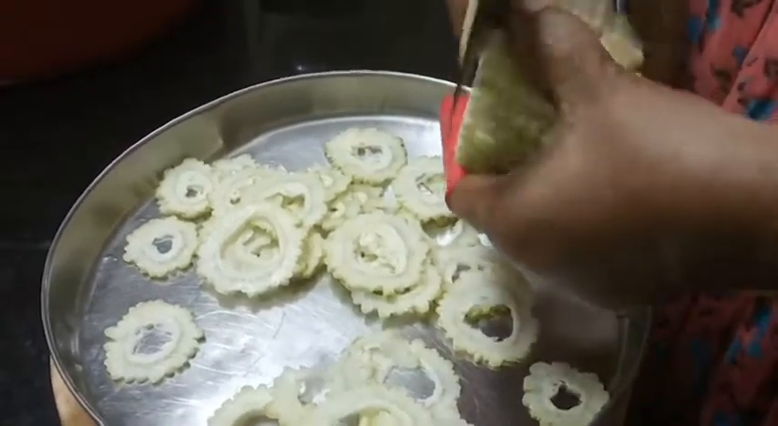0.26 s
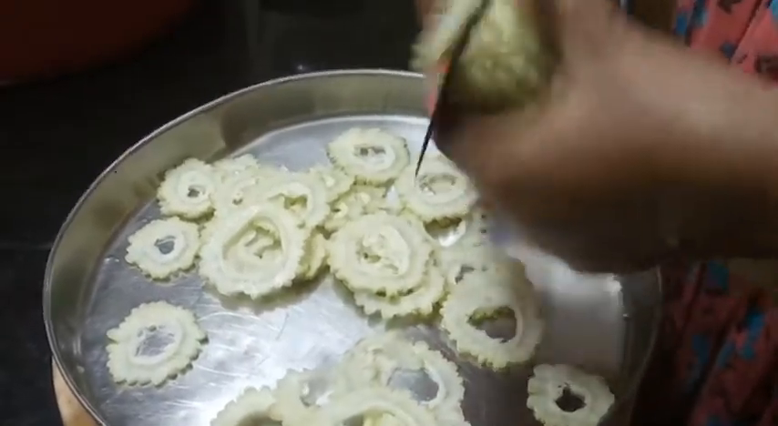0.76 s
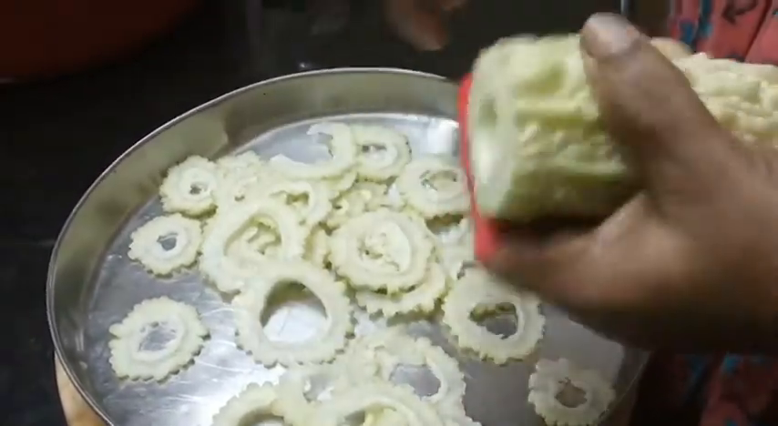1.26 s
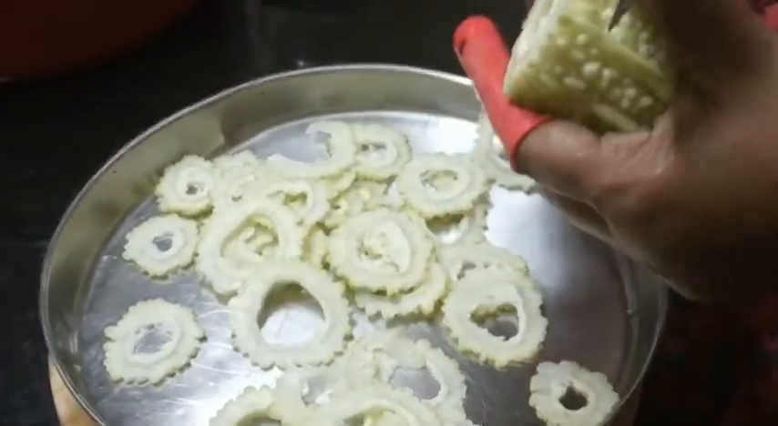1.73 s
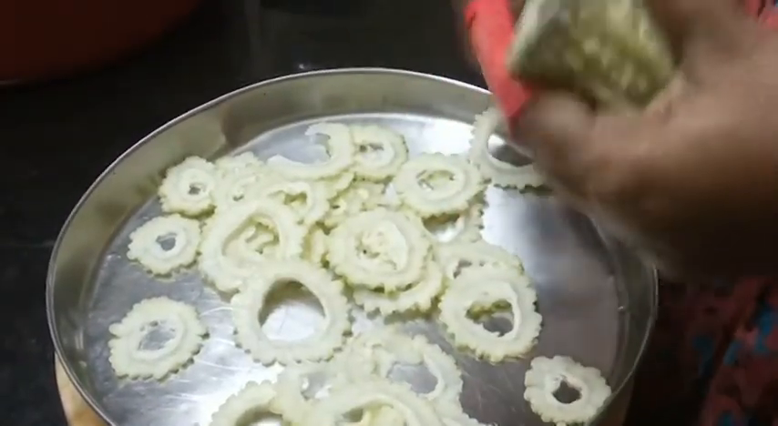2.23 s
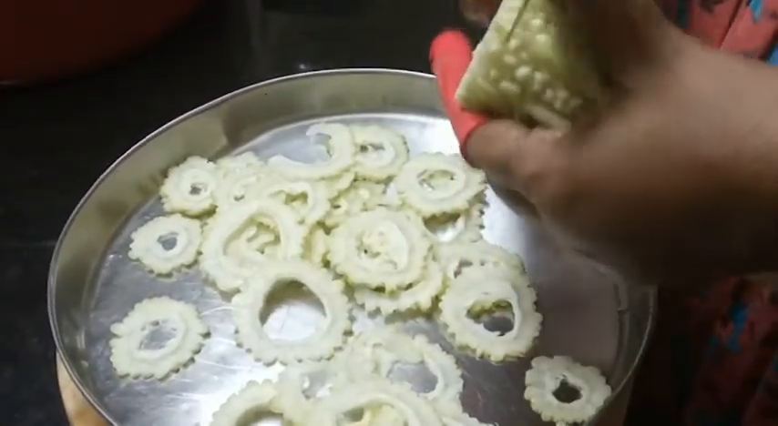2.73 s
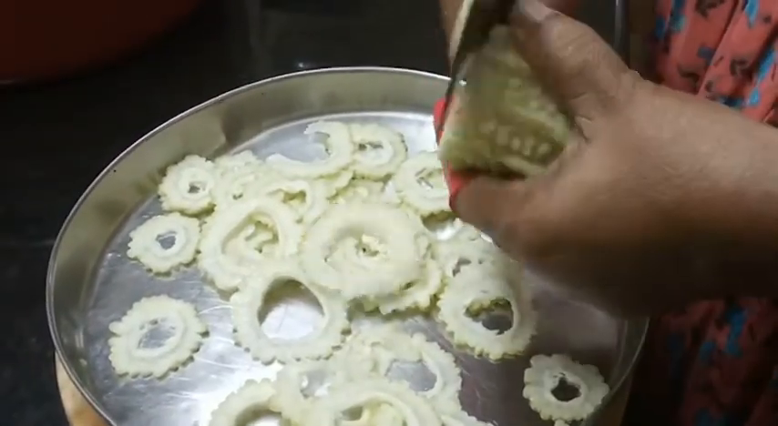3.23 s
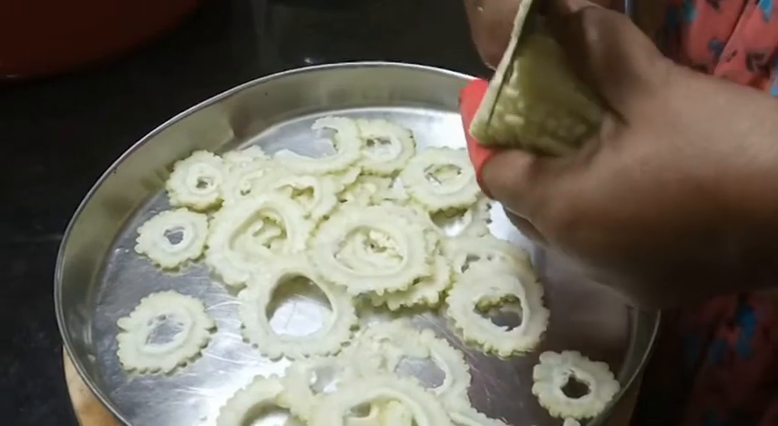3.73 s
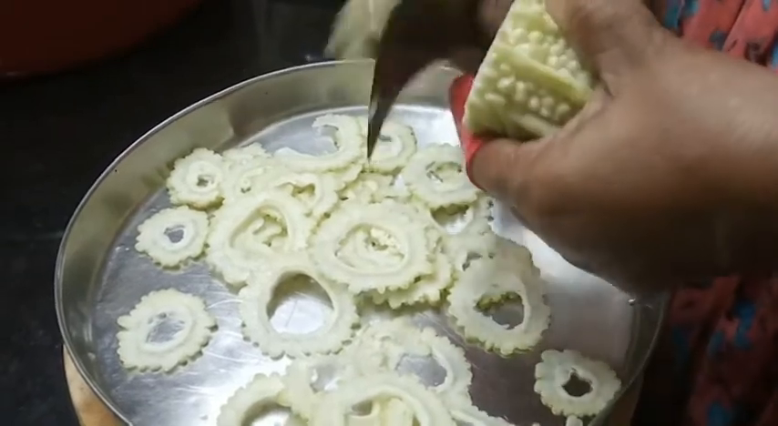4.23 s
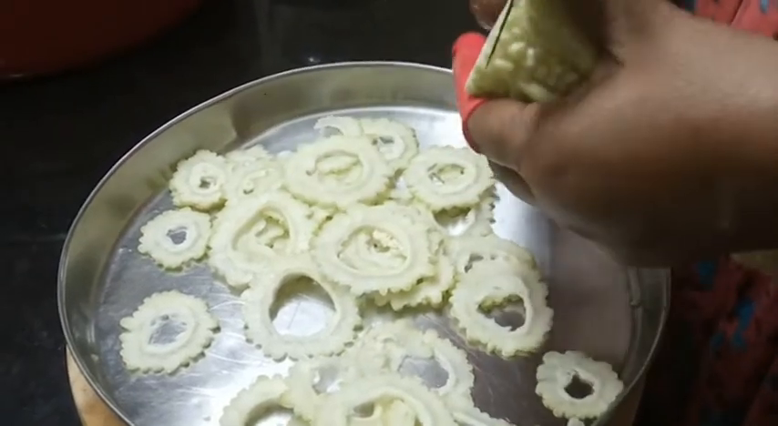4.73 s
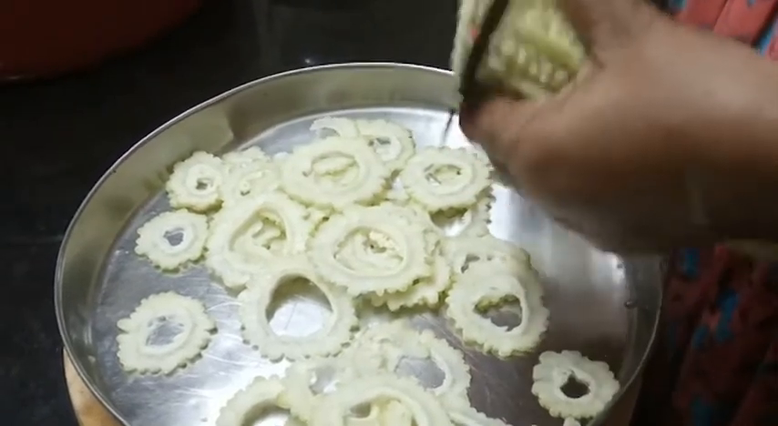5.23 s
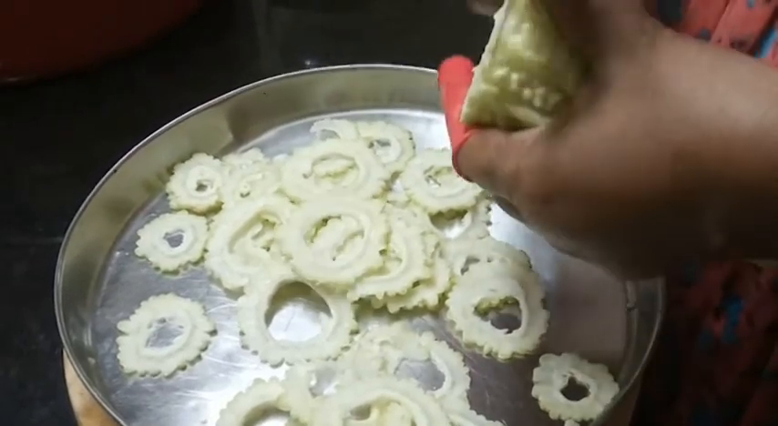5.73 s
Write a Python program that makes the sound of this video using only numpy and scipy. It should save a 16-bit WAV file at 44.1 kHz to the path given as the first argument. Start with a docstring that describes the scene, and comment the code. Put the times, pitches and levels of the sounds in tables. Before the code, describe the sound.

A knife rasps and snaps through a crisp, wet vegetable close to the microphone, in uneven short cuts with dull knocks over a metal tray.

```python
"""Knife through a hollow gourd

A knife saws and snaps through a crisp gourd held over a steel tray, close to a mono phone microphone.
A fine wet rasp of clumped noise swells and fades; each cut is a short burst of crackle.
Fibres snap as clicks with a broad ring; dull, rattling knocks drive the modes of gourd and tray.
Soft patches of resonant noise give low rumble, a hollow ring near 800 Hz and high squeaks.
The phone's noise suppressor lowers quiet bands, so tails end abruptly."""
import sys
import numpy as np
from scipy import signal
from scipy.fft import rfft, irfft, next_fast_len
from scipy.io import wavfile
from scipy.ndimage import uniform_filter1d

SR = 44100
rng = np.random.default_rng(int(sys.argv[2]) if len(sys.argv) > 2 else 0)


def pcm_store(signal):
    """Save signal as 16-bit PCM."""
    levels = np.round(np.clip(np.atleast_2d(signal), -1, 1) * 32767)
    wavfile.write(sys.argv[1], SR, levels.astype(np.int16).T)


N = 263718
HALF_S = np.arange(22050) / SR  # time axis of one event [s]

# Spectrum of breaking flesh, shared by cuts and snaps: (frequency [Hz], relative density [dB per Hz])
CRUNCH_COLOUR = [(410, -29), (700, -11), (1290, -5.5), (2680, -5), (2980, 0), (4340, -3), (6510, 1),
                 (8340, -6), (9630, -3.5), (15800, -15)]


def amp(db):
    """Level to amplitude: 20 dB is a factor of ten."""
    return 10 ** (np.asarray(db) / 20)


def evened(x):
    """Normalisation of signal power: scales x to rms 1."""
    return x / np.sqrt(np.mean(x ** 2) + 1e-20)


def read(points, hz):
    """Logarithmic frequency scale: interpolates a table of (frequency, value) along it."""
    f, value = np.transpose(points)
    return np.interp(np.log(hz + 1), np.log(f + 1), value)


def add(mix, s, sound):
    """Superposition: adds a sound to the mix from time s [s], cut off at the end of the mix."""
    part = mix[round(max(s, 0) * SR):][:len(sound)]
    part += sound[:len(part)]


def colour(x, db):
    """Linear filtering: multiplies the spectrum of x by the gain db(hz)."""
    size = next_fast_len(len(x))
    gain = amp(db(np.fft.rfftfreq(size, 1 / SR)))
    return irfft(rfft(x, size) * gain, size)[:len(x)]


def resonate(x, hz, width_hz):
    """Damped oscillator: one complex pole of about unit gain, whose damping sets the bandwidth."""
    r = np.exp(-np.pi * width_hz / SR)
    pole = r * np.exp(2j * np.pi * hz / SR)
    return 2 * signal.lfilter([1 - r], [1, -pole], x).real


def crackle(size, spread_db, clump):
    """Bursting cells: noise whose level wanders at random, in clumps of about one to five milliseconds."""
    wander = evened(uniform_filter1d(rng.standard_normal(size), size=clump))
    return evened(rng.standard_normal(size) * amp(spread_db * wander))


def rasp():
    """Sliding friction: wet flesh crackles on the blade, the suppressor opening and closing its ends."""
    # Contour before spectrum and make-up gain: (time [s], relative level [dB])
    contour = [(0.0, -31.5), (.05, -48.5), (.17, -53.5), (.33, -56), (.43, -49), (.65, -43), (.87, -45.5),
               (1.03, -35.5), (1.25, -38.5), (1.4, -43), (1.51, -39), (1.88, -47), (2.0, -45.5),
               (2.14, -50.5), (2.36, -54.5), (2.45, -49.5), (2.55, -54.5), (2.68, -48), (2.83, -51.5),
               (3.1, -53), (3.25, -52.5), (3.35, -58), (3.62, -51.5), (3.81, -69), (3.97, -45.5),
               (4.28, -55), (4.38, -44.5), (4.62, -43.5), (4.85, -50.5), (5.23, -46.5), (5.39, -65.5),
               (5.5, -59), (5.63, -76.5), (5.69, -69.5), (5.81, -80), (5.98, -69)]
    # Spectrum, held constant below 3 kHz: (frequency [Hz], relative density [dB per Hz])
    rasp_colour = [(1470, -36), (2500, 1), (3270, -4.5), (4670, -3.5), (6610, -2.5), (7890, -9.5),
                   (10000, -10), (15800, -28.5)]
    # Low end near 1.8 kHz, before an 8 dB offset: (time [s], relative level [dB])
    low_end = [(0, -18.5), (.25, -11), (.4, -12.5), (.95, -11.5), (1.1, -13), (1.5, -15.5), (1.8, -17),
               (2.1, -18.5), (2.4, -21), (2.65, -26.5), (3.0, -13), (3.6, -16), (3.95, -7.5), (4.35, -11.5),
               (4.7, -17.5), (5.25, -14.5), (5.4, -19), (5.98, -11)]
    # High end near 12 kHz, added to the brightness rule: (time [s], level change [dB])
    high_end = [(0, 7), (.25, 1), (.38, 6.5), (.9, -2), (1.7, 2.5), (2.1, 7.5), (2.55, 3), (2.9, 8),
                (3.25, -1), (3.4, 6), (3.7, 5), (4.2, 3.5), (4.5, 1), (5.0, 2.5), (5.3, 10.5), (5.47, 11.5),
                (5.6, 0), (5.7, 37), (5.98, 5)]
    bright_at_db, bright_slope = -38, 0.57  # brightness rule: pivot [dB], treble change [dB per dB of level]
    frame = dict(fs=SR, nperseg=256, noverlap=192)

    hz, t, z = signal.stft(crackle(N, 0.8, clump=30), **frame)
    level_db = np.interp(t, *np.transpose(contour))
    low_db = np.interp(t, *np.transpose(low_end)) + 8.0
    high_db = bright_slope * (level_db - bright_at_db) + np.interp(t, *np.transpose(high_end))

    # The suppressor opens and closes the lower and upper ends; each reaches over a range of frequency
    low_reach = np.interp(hz, [740, 1300, 1975, 2870, 3580], [5.0, 3.0, 0.9, 0.85, 0])[:, None]
    high_reach = np.interp(hz, [7500, 11000, 16000], [0, .9, 1.2])[:, None]
    ends_db = low_reach * low_db + high_reach * high_db
    shape_db = read(rasp_colour, np.maximum(hz, 3000)) - 40 * (hz < 720)

    patches = uniform_filter1d(rng.standard_normal(z.shape), size=2, axis=0)
    patches = evened(uniform_filter1d(patches, size=30, axis=1))
    # The suppressor leaves quiet passages patchier
    patches_db = patches * np.interp(level_db, [-62, -46], [3.6, 1.2])
    # The pressure wavers in all bands together
    patches_db += 1.26 * evened(uniform_filter1d(rng.standard_normal(len(t)), size=25))

    gain = amp(shape_db[:, None] + level_db + ends_db + patches_db)
    return amp(6.5) * signal.istft(z * gain, **frame)[1][:N]


def cuts():
    """Brittle fracture: each cut rises fast, holds while the wall of the gourd tears, and dies away."""
    # Cuts, nominal peak 13 dB above the rms of the grains:
    # (time [s], nominal peak [dB], relative level of the low end before a 14.5 dB offset [dB], hold [s])
    cut_table = [(0.0024, -23.5, -11.5, 0.0058), (0.219, -34, -27, 0.024), (0.5483, -30, -5.5, 0.013),
                 (0.7042, -23, -10, 0.028), (0.923, -26.5, -1, 0.0047), (1.911, -32, -14, .048),
                 (2.1898, -22.5, -11, 0.025), (2.6894, -40, -20, 0.024), (2.72, -31.5, -15.5, 0.02),
                 (2.895, -25, -10, 0.04), (3.443, -45, -18, 0.027), (3.472, -34.5, -8, 0.042),
                 (3.8335, -34.5, -19, 0.035), (3.857, -23.5, -11, 0.029), (4.6, -30.5, -9.5, 0.0056),
                 (4.6472, -28.5, -11, 0.0046), (4.672, -37, -9, 0.0045), (5.006, -36, -20.5, .03),
                 (5.034, -24, -16.5, 0.02), (5.074, -27, -11.5, 0.0084), (5.882, -39, -12, 0.031),
                 (5.923, -31, -9, 0.012)]
    rise = .012  # [s]
    out, t = np.zeros(N), HALF_S
    for s, db, low_db, hold in cut_table:
        t60 = .16 + 0.01 * (db + 33)  # [s], harder cuts die slower

        def spectrum_db(hz):
            low = (low_db + 14.5) * np.interp(hz, [1700, 2600], [1, 0])
            return read(CRUNCH_COLOUR, hz) + low - 20.0 * (hz < 720)

        grains = colour(crackle(len(t), 0.82, clump=40), spectrum_db)
        # The wall gives in steps of a few milliseconds
        grains *= amp(1.93 * evened(uniform_filter1d(rng.standard_normal(len(t)), size=260)))
        after = np.maximum(t - rise - hold, 0)
        envelope = np.minimum(t / rise, 1) ** 2 * amp(-60 * after / t60)
        add(out, s - .7 * rise, amp(db - 13.) * evened(grains) * envelope)
    return out


def snaps():
    """Sudden release of tension: a single fibre gives a click with a short, broad, damped ring."""
    # Snaps, nominal peak before a 9 dB cut: (time [s], nominal peak [dB], pitch [Hz])
    snap_table = [(0.0203, -24, 6650), (.9285, -23.5, 3300), (2.5712, -25, 6200), (2.5872, -29, 5700),
                  (2.7378, -36, 6600), (3.1524, -36.5, 3230), (3.1627, -35.5, 4150), (3.5014, -22.5, 6400),
                  (3.9505, -32.5, 4100), (4.559, -32, 4840), (5.0365, -28, 5000), (5.2264, -41, 4700),
                  (5.267, -36.5, 6430), (5.7367, -47, 5830), (5.8354, -53.5, 6500), (5.9, -29.5, 6900)]
    out, t = np.zeros(N), HALF_S[HALF_S < .12]
    for s, db, hz in snap_table:
        t60 = 220 / hz  # 220 cycles of the pitch to fall 60 dB
        noise = colour(rng.standard_normal(len(t)), lambda f: read(CRUNCH_COLOUR, f) - 30 * (f < 2600))
        ring = 0.53 * evened(noise) + 0.69 * evened(resonate(noise, hz, 660))
        # A fast rise and a stronger first instant
        crack = (1 + 0.52 * np.exp(-t / 0.00069)) * np.minimum(t / 0.00048, 1)
        add(out, s, amp(db - 9 - 60 * t / t60) * crack * ring)
    return out


def knocks():
    """Modal excitation: a blow and a loose rattle drive damped modes, struck differently each time."""
    # Dull knocks, nominal peak 8 dB above the early rms of the middle band:
    # (time [s], nominal peak [dB], bass below 450 Hz before a -6.5 dB offset [dB], rattle t60 [s])
    knock_table = [(0.023, -43, -4.5, 0.13), (0.41, -51.5, -1.5, 0.29), (0.551, -54, -33, 0.29),
                   (0.743, -34.5, 3, 0.23), (2.2, -41.5, -41, 0.22), (2.227, -44.5, 8.5, 0.18),
                   (2.9, -45, -20, 0.29), (2.932, -43, 10, 0.22), (3.153, -60.5, 20, 0.2),
                   (3.179, -53, 5, 0.34), (3.877, -26.5, -15.5, 0.38), (3.926, -37, -2.5, 0.6),
                   (3.989, -29.5, -7, 0.29), (4.283, -48, -53, 0.33), (4.635, -51.5, -35, 0.22),
                   (5.04, -46, -25, 0.35), (5.077, -36.5, -15, 0.15)]
    # Modes of gourd and tray, before tilt and random strike: (frequency [Hz], level [dB], t60 [s])
    body = [(143, -2, 0.15), (235.5, 6, 0.027), (285, -21, .07), (312.4, 5.5, 0.068), (398, -1, 0.13),
            (472.5, -12.5, 0.22), (600, -3, 0.072), (675, -3.5, 0.071), (778.3, 2, 0.13), (833, 3.5, 0.077),
            (970, -4.5, 0.015), (1050, -14.5, .06), (1172, -4, 0.052), (1313.5, -4.5, 0.14),
            (1403, -2.5, .06), (1780, -10.5, 0.066)]
    out, t = np.zeros(N), HALF_S
    for s, db, bass_db, rattle in knock_table:
        push = crackle(len(t), 4.4, clump=200) * amp(-60 * t / rattle) * (1 - np.exp(-t / 0.0022))
        # Only hard knocks start with a clear blow
        push += amp(db + 56.0) * (1 - t / 0.00035) * np.exp(-t / 0.00025) / 3

        strike_db = 3. * rng.standard_normal(len(body))
        modes = np.zeros(len(t))
        for (hz, mode_db, t60), own_db in zip(body, strike_db):
            tilt_db = (bass_db - 6.5) * (hz < 450) - 0.5 * (hz > 1000)
            decay = amp(mode_db + own_db + tilt_db - 60 * t / t60)
            modes += decay * np.sin(2 * np.pi * hz * t)

        sound = signal.fftconvolve(push, modes)[:len(t)]
        # The thinnest knocks lose still more bass
        sound = colour(sound, lambda hz: min(bass_db + 30, 0) * np.interp(hz, [380, 480], [1, 0]))
        sound *= np.minimum((t[-1] - t) / .1, 1)  # fade-out
        # Level is set by the band 450-1000 Hz over the first 25 ms
        middle = colour(sound, lambda hz: -40. * ((hz < 450) | (hz > 1000)))
        add(out, s, amp(db - 8) * sound / np.sqrt(np.mean(middle[t < .025] ** 2)))
    return out


def murmurs():
    """Resonant filtering: two equal resonances turn noise into soft rumbles, hollow rings and squeaks."""
    # Soft patches of noise, rms before the soft ends: (start [s], length [s], frequency [Hz], level [dB])
    murmur_table = [(0.407, .15, 793, -64.5), (.33, .13, 121, -70), (0.457, .19, 118, -65),
                    (0.618, 0.088, 3300, -48.5), (.77, 0.23, 125, -67), (.8, 0.089, 219, -58),
                    (.925, 0.066, 800, -55), (1.192, 0.073, 122, -70), (1.215, 0.11, 813, -62),
                    (2.715, .12, 785, -69.5), (2.95, 0.16, 326, -69), (3.045, 0.066, 132, -64),
                    (3.136, 0.037, 1170, -63.5), (3.147, .24, 336, -61.5), (3.202, .15, 680, -64),
                    (3.252, 0.09, 2740, -64), (3.298, 0.25, 883, -75.5), (3.599, .13, 890, -75),
                    (3.46, 0.14, 710, -70), (3.887, 0.14, 84, -47.5), (4.005, 0.2, 712, -59),
                    (4.035, 0.24, 129, -65.5), (4.116, 0.18, 637, -62.5), (4.333, 0.35, 867, -71),
                    (4.347, 0.085, 119, -66.5), (4.911, 0.054, 1273, -72.5), (5.071, 0.037, 317, -51),
                    (5.101, .12, 680, -64), (5.403, .1, 3620, -64), (5.43, .07, 2180, -70),
                    (5.453, 0.13, 4900, -65), (5.55, .2, 111, -82), (5.504, 0.1, 2490, -66),
                    (5.729, .064, 5800, -67.5)]
    # Bandwidth of each resonance: (frequency [Hz], width [Hz])
    widths = [(120, 24), (800, 84), (2400, 990), (5000, 490)]
    out = np.zeros(N)
    for s, length, hz, db in murmur_table:
        width_hz = read(widths, hz)
        noise = rng.standard_normal(len(HALF_S))
        noise = resonate(resonate(noise, hz, width_hz), hz, width_hz)
        size = min(round(length * SR), len(noise))
        add(out, s, amp(db) * evened(noise[-size:]) * signal.windows.tukey(size, .6))
    return out


def scene():
    """Superposition of all sources at one microphone, on both channels."""
    return np.tile(rasp() + cuts() + snaps() + knocks() + murmurs(), (2, 1))


def record(dry):
    """Spectral gating: bass cut, suppressor of quiet bands, faint circuit noise, band limit."""
    # Suppressor threshold: (frequency [Hz], power level [dB per bin])
    shut_below = [(60, -87), (300, -98), (1000, -91.5), (2500, -91), (4000, -90.5), (9000, -102),
                  (15000, -107)]
    # Spectrum of the circuit noise: (frequency [Hz], relative density [dB per Hz])
    floor_colour = [(18, -40), (30, -10), (165, -5), (471, -8), (883, -9), (1090, -9), (2270, -7),
                    (3190, -16), (3450, -11.5), (6830, -3.5), (15800, -32.5)]
    shut_db, floor_db, edge_hz = 16, -76, 15850  # drop of a quiet band [dB], noise rms [dB], band limit [Hz]
    frame = dict(fs=SR, nperseg=1024, noverlap=768)

    x = signal.sosfilt(signal.butter(8, 76, "highpass", fs=SR, output="sos"), dry[0])

    hz, t, z = signal.stft(x, **frame)
    power = uniform_filter1d(uniform_filter1d(abs(z) ** 2, size=4, axis=0), size=4, axis=1)
    under_db = read(shut_below, hz)[:, None] - 10 * np.log10(abs(power) + 1e-20)
    z = z * amp(-shut_db * (1 + np.tanh(under_db / 3)) / 2)  # soft switch a few dB wide
    x = signal.istft(z, **frame)[1][:N]

    x = x + amp(floor_db) * evened(colour(rng.standard_normal(N), lambda f: read(floor_colour, f)))
    low_pass = signal.firwin(511, edge_hz, window=("kaiser", 9), fs=SR)
    return np.tile(signal.oaconvolve(x, low_pass, "same"), (2, 1))


dry = scene()
out = record(dry)
pcm_store(out)
```